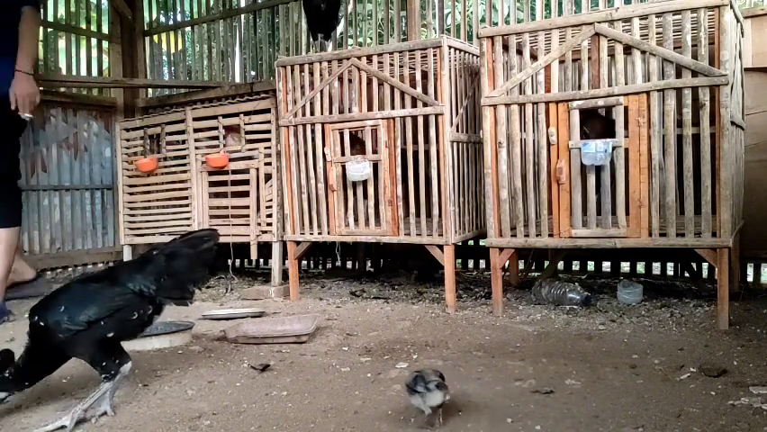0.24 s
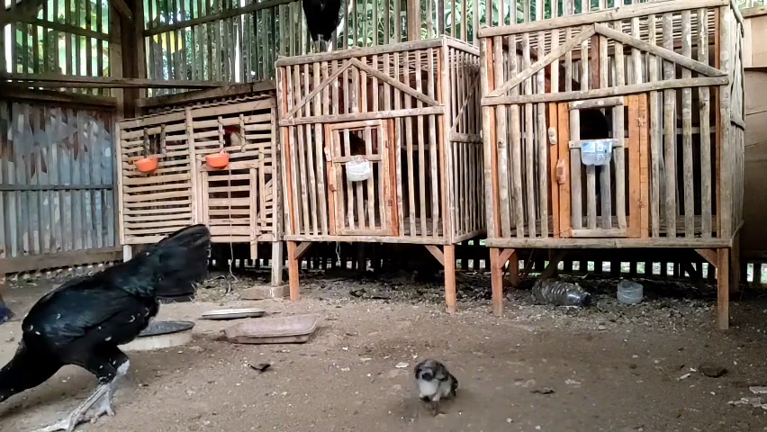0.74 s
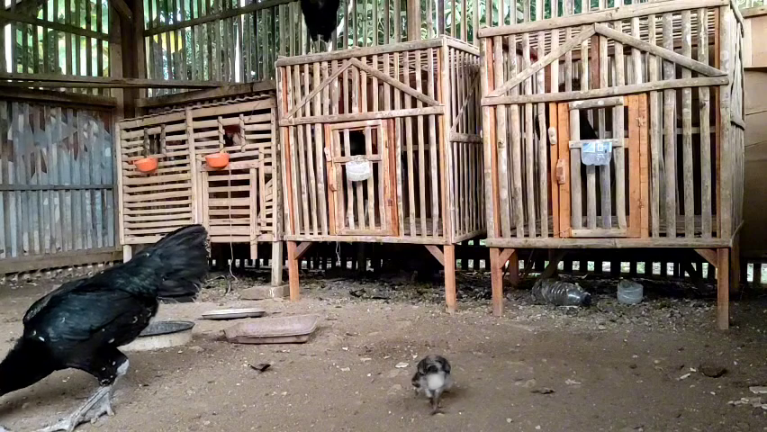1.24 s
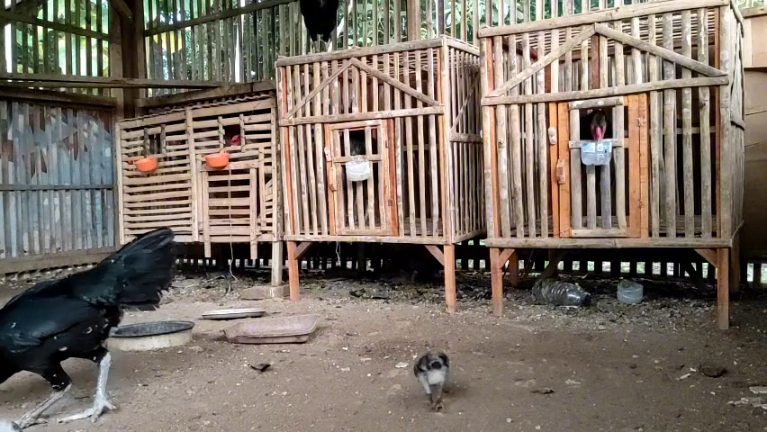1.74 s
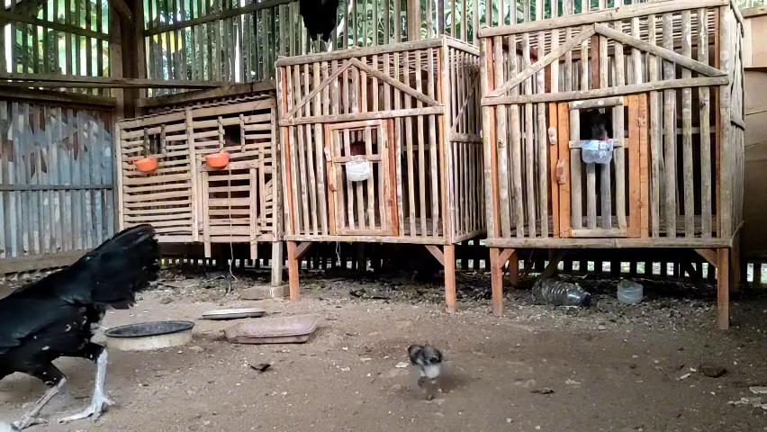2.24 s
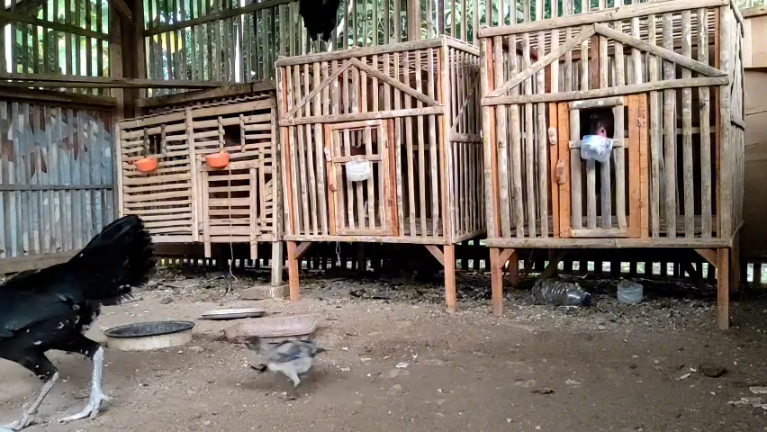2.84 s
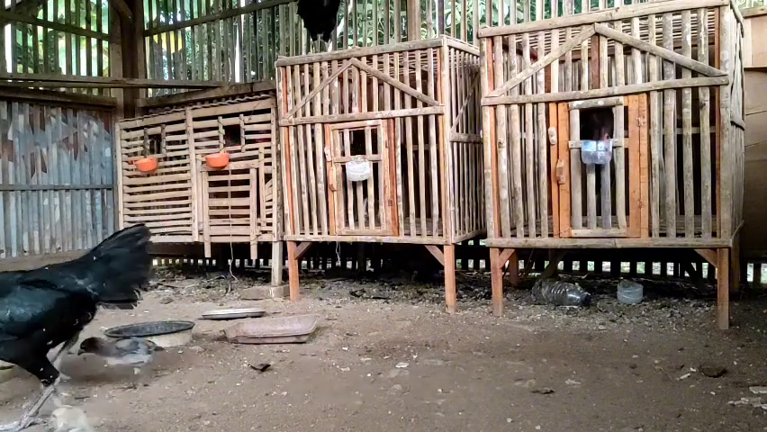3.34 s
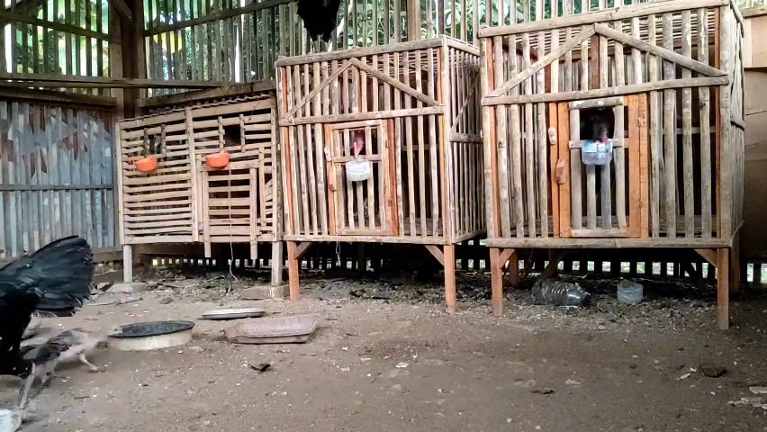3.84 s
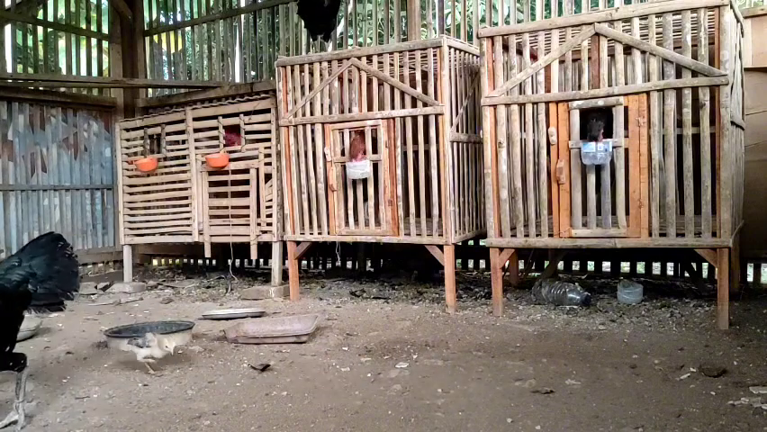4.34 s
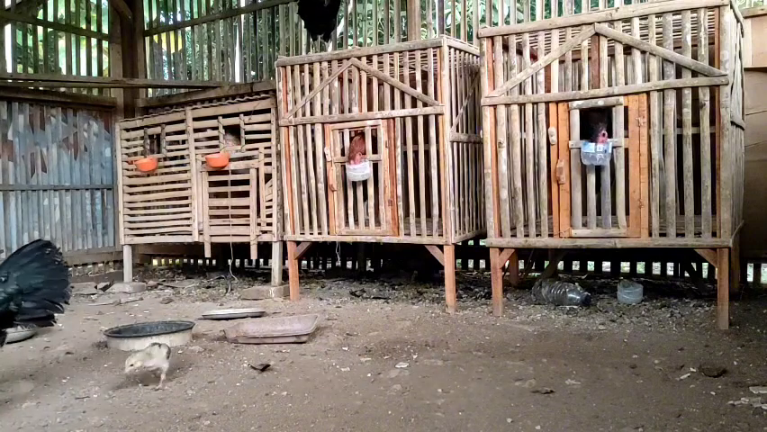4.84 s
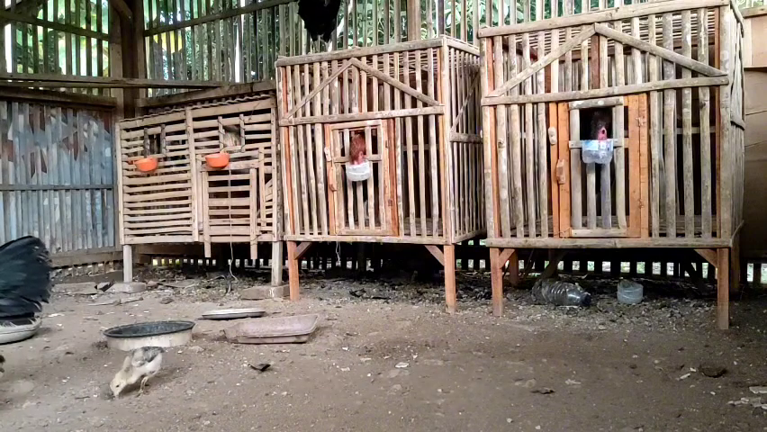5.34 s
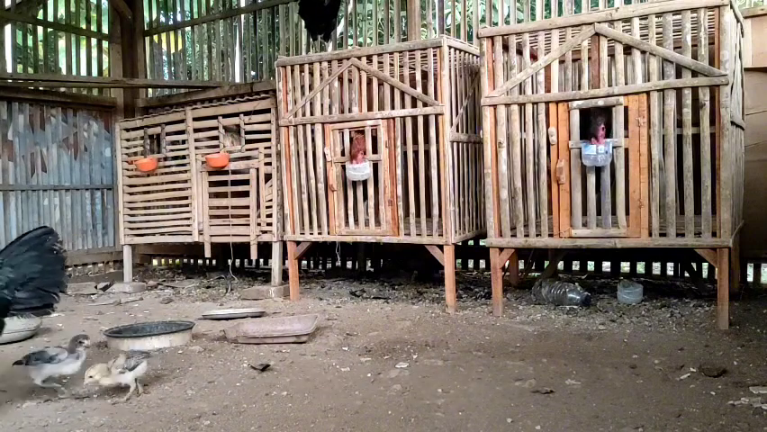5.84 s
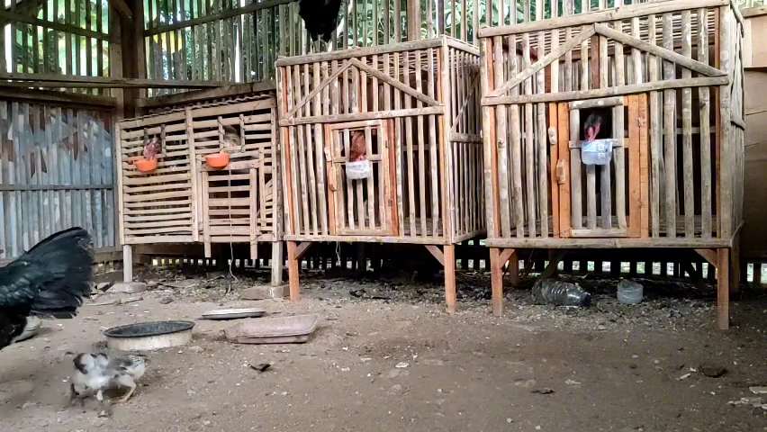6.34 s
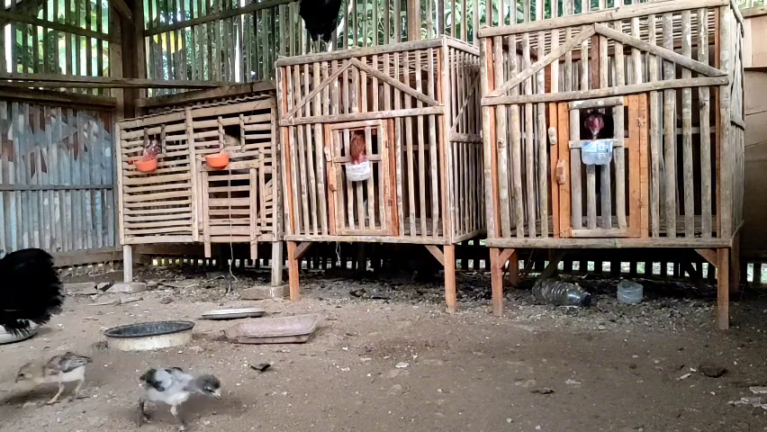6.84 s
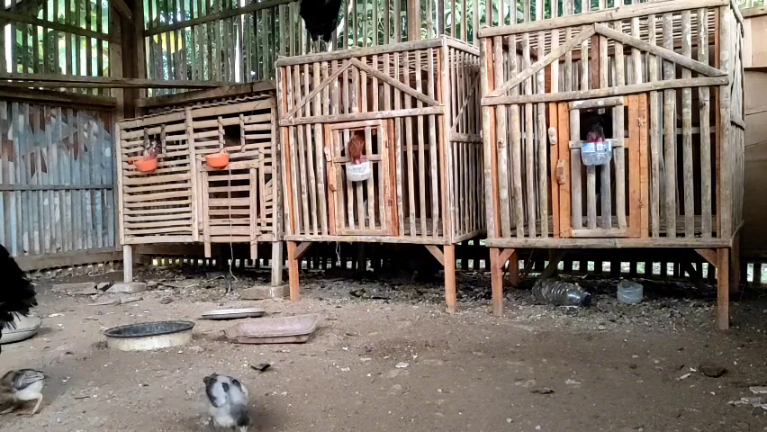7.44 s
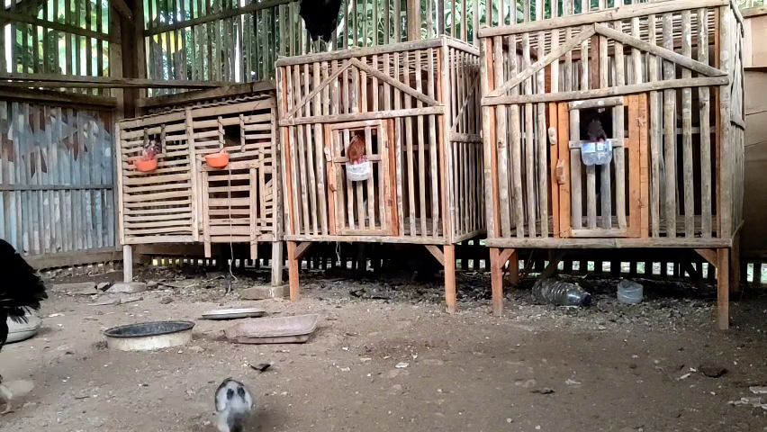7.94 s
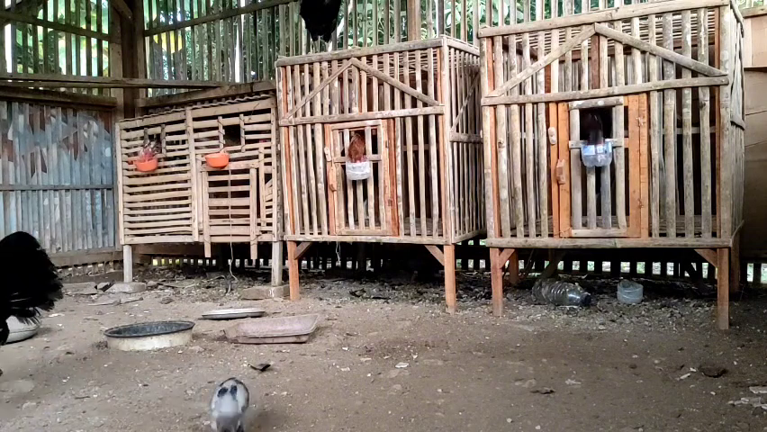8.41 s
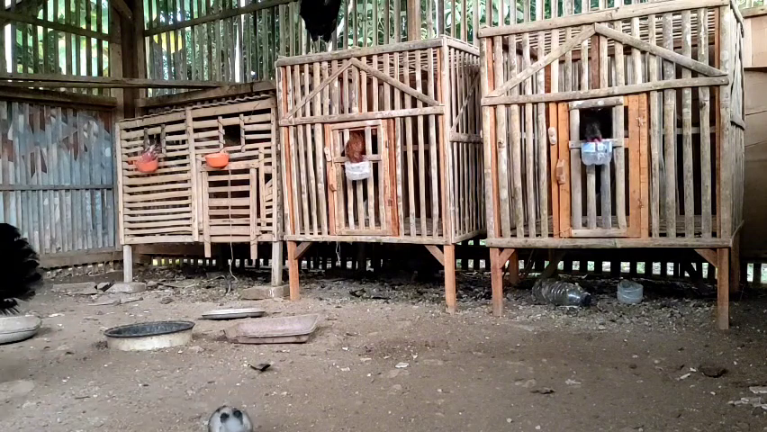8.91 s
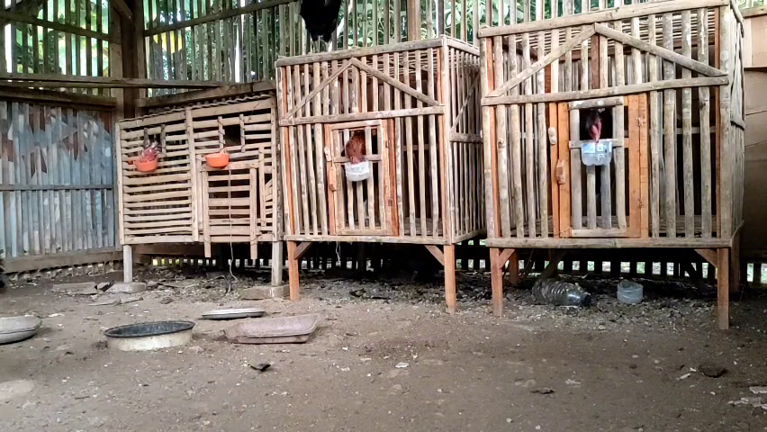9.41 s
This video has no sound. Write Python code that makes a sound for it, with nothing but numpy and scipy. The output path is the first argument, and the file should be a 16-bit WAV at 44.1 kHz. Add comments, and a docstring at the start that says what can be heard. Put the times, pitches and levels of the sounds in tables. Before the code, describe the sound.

Chicks peep all around a chicken shed while hens give short clucks, beaks knock on feed cups and dry grit is swept.

```python
"""A slatted chicken shed with a dirt floor at feeding time, heard on a stereo pair near the cage fronts.
Chicks whistle peeps all round, beaks and feet knock on feed cups and slats, and hens pulse short gruff
clucks through their throats. Litter is scratched up, then dry grit is swept in a few hissing strokes.
Far off, birds hold faint long notes over the outdoor rumble and a soft hiss."""
import sys
import numpy as np
from scipy import signal
from scipy.fft import rfft, irfft, next_fast_len
from scipy.io import wavfile
from scipy.ndimage import uniform_filter1d, map_coordinates

SR = 44100
rng = np.random.default_rng(int(sys.argv[2]) if len(sys.argv) > 2 else 0)


def store_pcm(level_fs):
    """Save levels as 16-bit WAV."""
    pcm = np.round(np.clip(level_fs, -1, 1) * 32767).astype(np.int16)
    wavfile.write(sys.argv[1], SR, np.atleast_2d(pcm).T)


N = 426447

# Levels in all tables are relative: each source adds its own gain.
# Outdoor rumble, yard murmur and far hiss. Each row: frequency in Hz, level in dB.
RUMBLE_SPECTRUM = [(15, -41), (25, -8.5), (123, -9), (177, -2.5), (248, -10.5), (267, -16), (307, -14),
                   (375, -25), (409, -16.5), (500, -23), (650, -28), (1100, -120)]
YARD_SPECTRUM = [(200, -7.5), (400, -1), (700, 3), (1200, -1), (2000, -5.5), (3500, -5.5), (6000, -30)]
FAR_HISS_SPECTRUM = [(2500, -14), (5000, 3), (6700, 2), (7700, 8.5), (8700, -5), (10000, -11),
                     (16000, -15.5)]
# Rise and fall of the yard murmur. Each row: time in seconds, level in dB.
YARD_LEVEL = [(0, -44), (.5, -51), (2.85, -49.5), (3.05, -37), (4.4, -42), (6, -38.5), (7.2, -44),
              (8.35, -51.5), (9.3, -49.5)]
# Near peeps that slide down, turn and flick up. Each row: time of the turn in seconds,
# pitch there in Hz, slide in seconds, flick in seconds, level in dB.
SCOOPS = [(0.257, 2590, 0.02, 0.043, -29), (0.318, 2397, 0.02, 0.026, -31.5),
          (0.494, 2910, 0.029, .04, -30.5), (0.507, 2610, 0.015, 0.031, -30),
          (.736, 2725, 0.029, 0.033, -30), (.846, 2440, .018, 0.037, -29.5),
          (1.054, 2684, 0.012, 0.022, -25), (1.422, 2510, .005, 0.039, -31),
          (1.711, 2508, 0.035, 0.046, -27.5), (1.936, 2460, 0.026, 0.039, -30.5),
          (2.353, 2544, .008, 0.049, -31.5), (2.92, 2480, 0.0096, 0.049, -31),
          (3.122, 2730, 0.031, 0.033, -30), (3.936, 2500, 0.0025, 0.034, -30),
          (5.153, 2590, 0.027, 0.022, -33), (5.345, 2830, 0.019, 0.032, -30),
          (5.433, 2484, 0.013, 0.034, -30.5), (5.805, 2280, 0.0088, 0.032, -32.5),
          (6.228, 2760, 0.013, 0.034, -29), (6.342, 2356, 0.025, .03, -30),
          (6.519, 2365, 0.026, 0.039, -30.5), (6.931, 2610, .017, 0.029, -28.5),
          (6.994, 2416, 0.013, .035, -34), (7.148, 2670, 0.026, 0.034, -30.5),
          (7.148, 2365, 0.019, 0.014, -27), (7.772, 2400, 0.0071, .035, -35),
          (7.826, 2720, 0.017, 0.036, -30.5), (7.978, 2420, 0.0042, .036, -29),
          (8.061, 2746, 0.014, 0.018, -32.5), (8.322, 2610, .02, .038, -36),
          (8.545, 2425, 0.028, 0.036, -32.5), (8.72, 2600, 0.019, 0.028, -33),
          (8.809, 2930, 0.027, 0.029, -33), (9.124, 2450, 0.041, 0.025, -30),
          (9.374, 2745, 0.034, 0.04, -29), (9.616, 2910, 0.032, 0.042, -29)]
# Falling peeps, more echoing, from chicks further back in the cages.
# Each row: start in seconds, length in seconds, top pitch in Hz, level in dB.
DROPS = [(.045, 0.045, 4490, -32.5), (0.092, 0.036, 3170, -31), (0.336, 0.034, 3480, -30),
         (0.985, 0.062, 4230, -31), (1.541, .052, 3960, -35), (1.544, 0.03, 2820, -32.5),
         (1.681, 0.068, 4160, -33), (1.778, 0.038, 3210, -33.5), (1.848, 0.053, 4390, -33),
         (2.059, 0.041, 3150, -31.5), (2.257, 0.023, 3080, -28), (2.317, 0.068, 4270, -31.5),
         (2.453, 0.055, 4390, -30.5), (2.46, 0.028, 3320, -29.5), (2.58, 0.049, 3180, -33),
         (2.697, 0.036, 3270, -33.5), (2.954, 0.064, 4306, -27), (3.063, .085, 4060, -28.5),
         (3.193, 0.074, 4230, -31), (3.639, 0.067, 4335, -28), (3.643, .025, 3100, -29),
         (3.801, .03, 3100, -33), (3.87, 0.032, 3600, -28.5), (3.973, 0.041, 3800, -29),
         (4.189, 0.065, 4020, -31), (4.209, 0.032, 3100, -25.5), (4.324, 0.053, 4160, -27.5),
         (4.468, .062, 4134, -29), (4.521, 0.038, 3120, -28), (4.635, 0.04, 3720, -33.5),
         (4.96, 0.035, 3870, -35), (5.102, 0.037, 4050, -34), (5.278, 0.038, 3200, -31.5),
         (5.669, 0.052, 3030, -31.5), (6.325, 0.05, 4160, -36), (6.482, 0.042, 4330, -29.5),
         (6.76, 0.04, 3040, -28.5), (7.058, 0.034, 3260, -31.5), (7.59, 0.061, 2903, -29.5),
         (7.681, 0.049, 3110, -33.5), (8.11, 0.058, 4120, -39), (8.487, 0.07, 3050, -35),
         (8.823, 0.029, 3020, -29.5), (8.91, .044, 3224, -31.5), (9.222, 0.02, 3100, -28.5)]
# Flatter cheeps. Each row: start and length in seconds, middle pitch and glide in Hz, level in dB.
CHEEPS = [(0, 0.013, 2865, -600, -26), (0.288, .037, 3230, -400, -44), (.625, 0.036, 2230, -160, -48),
          (1.145, 0.043, 2576, -150, -29), (1.221, 0.054, 3000, 734, -27), (1.344, 0.039, 2720, -220, -27),
          (2.636, 0.04, 2724, 186, -34.5), (2.83, 0.062, 2530, -150, -31.5), (2.9, 0.047, 4570, -86, -30),
          (3.517, 0.054, 4210, -250, -28.5), (6.053, 0.049, 2860, -150, -30),
          (6.364, 0.138, 2824, 169, -34), (7.212, 0.047, 3020, -450, -31.5), (7.27, 0.03, 1705, -60, -42),
          (7.739, 0.044, 2980, -340, -33.5), (7.851, 0.084, 2992, -250, -32.5),
          (8.233, 0.046, 2768, 60, -27), (9.189, 0.064, 3085, -340, -34)]
# A chick's overtones leaving the beak. Each row: frequency in Hz, level in dB.
PEEP_OVERTONES = [(5000, -13.5), (6200, -8.5), (7200, -16), (8500, -21.5), (12000, -47)]
# Beaks and feet striking. Each row: time in seconds, level in dB, hardness from 0 (dull, on a slat)
# to 1 (sharp, on a cup), lead of the first graze in seconds.
KNOCKS = [(0.124, -35, 0.82, 0.0082), (.18, -33, 0.42, 0.0035), (.357, -42, 0.8, 0.0023),
          (1.98, -31, 0.48, 0.027), (2.11, -24.5, 0, 0.0027), (2.578, -19, 0.3, 0.0022),
          (2.603, -16.5, 0.17, 0.00091), (2.88, -18, 0.019, 0.0061), (2.984, -26.5, 0.089, 0.0022),
          (3.285, -29, 0.76, 0.0032), (3.393, -16, 0.17, 0.0024), (3.442, -20.5, 0.76, .002),
          (3.54, -15, .6, 0.023), (3.594, -23.5, 1, 0.0019), (3.688, -25.5, 0.45, 0.043),
          (3.774, -17, 0.68, 0.0052), (3.826, -33, 1, 0.0018), (3.945, -27.5, 0, 0.0024),
          (4.071, -21, 0.35, 0.0019), (4.424, -15.5, 0.76, 0.0077), (4.701, -19, 0.44, 0.0019),
          (4.765, -30.5, .1, 0.0023), (5.015, -18.5, 0.59, .022), (5.365, -27, 0.33, 0.0018),
          (5.819, -16.5, 0.26, 0.00102), (6.175, -25, 0.45, 0.021), (6.268, -31.5, 0.79, 0.0019),
          (6.436, -25, 0.48, .002), (6.448, -25.5, .7, .002), (6.733, -15.5, 0.78, 0.021),
          (7.039, -27, .4, .002), (7.325, -19.5, 0.36, .003), (7.374, -21.5, 0.47, 0.0024),
          (7.428, -27, 0.54, 0.0025), (7.621, -16.5, 0.63, 0.0023), (7.642, -17, 0.87, .002),
          (7.952, -15, 0.71, 0.027), (8.18, -18, 0.47, 0.0019), (8.269, -11.5, 0.99, 0.01),
          (8.482, -19.5, 0.4, 0.016), (8.51, -26, 0.07, 0.0019), (8.592, -13, 0.94, .008),
          (8.802, -24.5, .2, 0.0022), (8.997, -19, 0.7, 0.016), (9.314, -13.5, 0.93, 0.012),
          (9.535, -20.5, 0.61, 0.0021)]
# Ring of a feed cup. Each row: frequency in Hz, width in Hz, level in dB.
CUP_MODES = [(1124, 83, 9), (1320, 64, 3), (1400, 79, -3.5), (1460, 120, -18.5)]
# A peck's force, a slat's thud and loose grain's tick. Each row: frequency in Hz, level in dB.
PECK_SPECTRUM = [(300, -5.5), (900, 2), (1650, -0.5), (2000, -10), (2700, 1.5), (4000, -4.5), (12000, -25)]
SLAT_SPECTRUM = [(90, -33), (200, -13.5), (320, -2.5), (420, -4), (570, -1), (800, -8), (1000, 3.5),
                 (1800, -49), (3000, -59), (9000, -69)]
TICK_SPECTRUM = [(900, -35.5), (1800, -3.5), (2600, 6), (3300, -5), (4200, 1.5), (5300, -1.5), (7500, -1),
                 (8800, -6.5), (10500, -19), (16000, -26.5)]
# Claws and beaks on grit. Each row: time in seconds, level in dB.
GRIT_CLICKS = [(0.177, -26), (.745, -27.5), (0.849, -31), (1.354, -29.5), (1.979, -20), (2.111, -32),
               (2.48, -29), (2.58, -45), (2.876, -18), (3.282, -21.5), (3.511, -24), (3.558, -17.5),
               (3.591, -19), (3.652, -28), (4.765, -24), (4.994, -32), (5.314, -24), (6.152, -21),
               (6.449, -19), (7.427, -23), (7.919, -15.5), (8.356, -27.5), (8.411, -32.5), (8.678, -28),
               (9.302, -25.5), (9.405, -30)]
# Hens clucking. Each row: start in seconds, length in seconds, pitch in Hz, level in dB,
# throat resonance in Hz, roughness from 0 to 1.
CLUCKS = [(1.009, 0.024, 182.2, -22, 510, 0.31), (1.403, 0.046, 208.7, -25.5, 530, 0.42),
          (1.422, 0.019, 200, -23.5, 810, 0.12), (2.114, 0.046, 187.7, -37, 670, 0.54),
          (2.587, 0.047, 175, -22, 910, 0.1), (3.387, 0.015, 197, -17.5, 470, 0.3),
          (3.426, 0.043, 189.7, -21, 760, 0.6), (4.068, 0.036, 203.6, -27, 600, 0.2),
          (5.819, 0.027, 189.4, -25, 746, 0.4), (8.49, 0.046, 193.6, -29, 603, 0.29),
          (8.801, 0.032, 180.2, -27, 570, 0.38)]
# Overall tone of a hen's voice. Each row: frequency in Hz, level in dB.
HEN_SPECTRUM = [(100, 9), (250, -7), (1300, -0.5), (2300, -2.5), (6000, -44)]
# Distant birds, one list to a note. Each row: time in seconds, pitch in Hz, level in dB.
FAR_NOTES = [
    [(2.97, 430, -56), (3.08, 430, -43), (3.3, 408, -43), (3.55, 408, -38), (3.75, 402, -40),
     (3.95, 390, -52)],
    [(4.55, 670, -58), (4.8, 725, -49), (5.3, 705, -48), (5.75, 685, -48), (6.2, 680, -54), (7.3, 650, -57)],
]
# Scratches in the litter, feet trampling the ground and sweeps over grit.
# Each row: time of full force in seconds, hold in seconds, level in dB, release in dB per second.
SCRATCHES = [(2.99, 0.34, -32, 150), (3.282, 0.0066, -19, 131), (3.394, 0.059, -23, 130),
             (3.511, 0.037, -27, 75), (3.776, 0.0075, -27.5, 78), (3.955, 0.11, -37, 164),
             (4.085, 0.011, -22, 262)]
TRAMPLES = [(2.99, 0.29, -28, 120), (3.392, 0.38, -28.5, 60)]
SWEEPS = [(4.72, 0.26, -14, 83), (5.535, 0.11, -14, 38), (5.93, 0.17, -22.5, 99.5),
          (6.625, 0.011, -17, 59.5)]
# Crackling litter, trampled ground and swept grit. Each row: frequency in Hz, level in dB.
LITTER_SPECTRUM = [(900, -27), (1800, -20), (3400, -12.5), (4300, -6.5), (5400, -6), (7400, -4),
                   (8800, -10), (10400, -20), (16000, -31)]
GROUND_SPECTRUM = [(88, -41), (150, -6), (363, -7.5), (404, 1), (599, -23), (932, -10), (1330, -18),
                   (1480, -12.5), (2280, -26), (2600, -15), (3380, -44), (5720, -120)]
SWEEP_SPECTRUM = [(500, -30), (1000, -23.5), (1500, -15), (2000, -13), (2750, -9), (3700, -13), (5300, -11),
                  (6400, -9.5), (7500, -6.5), (9000, -11), (10000, -17.5), (12000, -20), (16000, -22.5)]
# The shed's reverberation. Each row: frequency in Hz, seconds to die away by 60 dB.
SHED_T60 = [(200, 0.32), (1200, 0.28), (3000, 0.39), (9000, 0.24)]
# Phase between the microphones near the cage fronts. Each row: frequency in Hz, left lead in radians.
FRONT_PHASE = [(100, -1.1), (500, 0.37), (700, -1.5), (950, 2.5), (1100, 1.9), (1350, -2), (1700, -0.3)]
# Microphone port resonances, left then right. Each row: frequency in Hz, width in Hz, level in dB.
MIC_PORTS = [(8670, 720, 10.5), (7346, 1230, 9)]


def amp(db):
    """Decibels to gain."""
    return 10 ** (np.asarray(db) / 20)


def unit(x):
    """Scale to rms 1."""
    return x / np.sqrt(np.mean(x ** 2) + 1e-20)


def along(points, hz):
    """Read (Hz, value) points on a log axis."""
    freqs, values = np.transpose(points)
    return np.interp(np.log(hz + 1), np.log(freqs + 1), values)


def curves(rows):
    """One value per sample for each column after the time."""
    times, *columns = np.transpose(rows)
    return [np.interp(np.arange(N) / SR, times, column) for column in columns]


def during(rows):
    """A soft gate over the span of a curve table."""
    t = np.arange(N) / SR
    return uniform_filter1d(1. * ((t > rows[0][0]) & (t < rows[-1][0])), size=900)


def wobble(rate, n=N):
    """A smooth random curve, rate knots a second."""
    knots = rng.standard_normal(int(n * rate / SR) + 4)
    return map_coordinates(knots, [np.arange(n) * rate / SR])


def panned(left_db):
    """Left and right gains of mean power 1."""
    return unit(amp([[left_db / 2], [-left_db / 2]]))


def add(track, start, x):
    """Mix x into the track from start, in seconds."""
    part = track[:, max(round(start * SR), 0):][:, :x.shape[-1]]
    part += x[..., :part.shape[-1]]


def filtered(x, response):
    """Pass x through a complex response of frequency."""
    n = x.shape[-1]
    padded = 2 * next_fast_len(n // 2 + 2048)
    return irfft(rfft(x, padded) * response(np.fft.rfftfreq(padded, 1 / SR)), padded)[..., :n]


def colour(points):
    """The causal response with this (Hz, dB) spectrum."""
    def response(hz):
        cepstrum = irfft(np.log(amp(along(points, hz))))
        cepstrum[1:len(hz) - 1] *= 2
        cepstrum[len(hz):] = 0
        return np.exp(rfft(cepstrum))
    return response


def resonances(modes):
    """The response of (Hz, width Hz, dB) modes, alternating in sign."""
    return lambda hz: sum((-1) ** k * amp(db) * 1j * hz * width / (centre**2 - hz**2 + 1j * hz * width)
                          for k, (centre, width, db) in enumerate(modes))


def rush(spectrum, alike, grain_db=0):
    """Stereo noise of rms 1; alike correlates the microphones, grain_db clumps it into tiny impacts."""
    mid, side = rng.standard_normal((2, N)) * amp(grain_db * np.minimum(wobble(1400), 2))
    turn = np.arccos(alike) / 2
    mid, side = mid * np.cos(turn), side * np.sin(turn)
    return unit(filtered(np.array([mid + side, mid - side]), lambda hz: amp(along(spectrum, hz))))


def in_shed(x, near_db, tail_db, near_t60):
    """Add echoes of the nearby cages and the shed's tail, new for each position."""
    hz, t, noise = signal.stft(rng.standard_normal((2, SR // 3)), SR, nperseg=256)
    shared = amp(-hz / 200)[:, None]  # long waves reach both microphones alike
    noise = np.sqrt(1 - shared ** 2) * noise + shared * (noise[0] + noise[1]) / np.sqrt(2)
    tail = signal.istft(noise * amp(-60 * t / along(SHED_T60, hz)[:, None]), SR, nperseg=256)[1]
    t = np.arange(tail.shape[1]) / SR
    tail *= 1 - np.exp(-t / 0.0041)
    near = tail * amp(-60 * t / near_t60)
    echo = amp(near_db) * near / np.linalg.norm(near[0]) + amp(tail_db) * tail / np.linalg.norm(tail[0])
    echo[:, 0] += 1  # the direct sound
    return signal.fftconvolve(np.atleast_2d(x), echo / np.linalg.norm(echo[0]), axes=1)


def off_cages(x):
    """Reflections from the cage fronts turn the phase between the microphones."""
    return filtered(x, lambda hz: np.exp(.5j * along(FRONT_PHASE, hz) * np.array([[1], [-1]])))


def background():
    """Rumble, yard murmur and far hiss lie behind small feet pattering on grit."""
    yard_db, = curves(YARD_LEVEL)
    rumble = amp(-40 + wobble(17)) * rush(RUMBLE_SPECTRUM, alike=0.89) * panned(5.3)
    yard = amp(yard_db + 4.5 * wobble(21)) * rush(YARD_SPECTRUM, alike=0.043) * panned(2.3)
    hiss = amp(-52.5) * rush(FAR_HISS_SPECTRUM, alike=0.03)
    patter = amp(-55.5 + 5.5 * wobble(28)) * rush(TICK_SPECTRUM, alike=0.059, grain_db=9.5)
    return rumble + yard + hiss + patter


def peep(hz, db, far_db=0, fade_db=0):
    """A chick whistles along a pitch path from a random spot; far_db adds echo."""
    n = len(hz)
    side, distance, brightness = rng.standard_normal(3)
    echo_db = -2.5 + 1.5 * distance + far_db
    phase = 2 * np.pi * np.cumsum(hz * (1 + 0.0074 * wobble(480, n))) / SR
    overtones = sum(amp(along(PEEP_OVERTONES, k * hz) + 1.2 * brightness) * np.sin(k * phase)
                    for k in (2, 3))
    swell = signal.windows.tukey(n, .2) * amp(2.8 * wobble(118, n) - fade_db * np.linspace(0, 1, n))
    whistle = unit((np.sin(phase) + overtones) * swell)
    sound = in_shed(whistle, near_db=echo_db, tail_db=echo_db, near_t60=.14)
    return amp(db - 2) * panned(-1.5 + 0.91 * side) * sound


def drop(top_hz, length):
    """A peep's pitch falls ever faster; the higher it starts, the longer it lingers at the top."""
    toward_hz, share_of_way = 2217, .8
    progress = np.linspace(0, 1, int(length * SR))
    arch = 1.1 * (top_hz / toward_hz) ** 1.45
    return top_hz - share_of_way * (top_hz - toward_hz) * progress ** arch


def scoop(turn_hz, slide_s, flick_s):
    """A peep's pitch bends down to a turn and up again."""
    slide_hz, flick_hz, bend_s = 787, 1034, .03  # pitch above the turn, bend_s before and after it
    t = np.arange(-int(slide_s * SR), int(flick_s * SR)) / SR
    return turn_hz + np.where(t < 0, slide_hz, flick_hz) * (t / bend_s) ** 2


def chicks(chatter_per_s=3):
    """Near chicks scoop and cheep; falling peeps and faint chatter echo from further back."""
    out = np.zeros((2, N))
    for turn, hz, slide_s, flick_s, db in SCOOPS:
        add(out, turn - slide_s, peep(scoop(hz, slide_s, flick_s), db, fade_db=2))
    for start, length, hz, db in DROPS:
        add(out, start, peep(drop(hz, length), db, far_db=3, fade_db=-3))
    for start, length, hz, glide_hz, db in CHEEPS:
        add(out, start, peep(hz + glide_hz * np.linspace(-.5, .5, int(length * SR)), db))
    for when, height, kind in rng.random((int(chatter_per_s * N / SR), 3)):
        if kind < .5:
            path = drop(3000 + 1200 * height, length=.05)
        else:
            path = scoop(2400 + 500 * height, slide_s=.022, flick_s=.036)
        add(out, when * N / SR, peep(path, db=-49, far_db=3))
    return out


def impact(response, rattle, rattle_t60, near_db, tail_db):
    """A hit and its brief rattle sound through one body into the shed; rms 1 over the first 10 ms."""
    t = np.arange(SR // 10) / SR
    force = rattle * rng.standard_normal(len(t)) * amp(-60 * t / rattle_t60)
    force[0] += 1
    sound = in_shed(filtered(force, response), near_db, tail_db, near_t60=0.097)
    return sound / np.sqrt(np.mean(sound[:, :SR // 100] ** 2))


def blow(db, hardness):
    """A sharp peck is dry and rings the cup's upper modes; a dull one thuds and rings the lowest."""
    clean = hardness ** 2.15  # how far the cup takes over from the slats
    modes = [(hz, width, level + rng.normal(0, 3.4) - (13 * clean if k == 0 else 9 * (1 - clean)))
             for k, (hz, width, level) in enumerate(CUP_MODES)]

    def cup(hz):
        return sum(resonances([mode])(hz) for mode in modes) * colour(PECK_SPECTRUM)(hz)
    thud = impact(colour(SLAT_SPECTRUM), rattle=0.23, rattle_t60=0.057, near_db=-9.5, tail_db=1)
    ring = impact(cup, rattle=0.11, rattle_t60=0.012, near_db=-7.9 * clean, tail_db=-4 - 7.8 * clean)
    return amp(db) * (amp(-1.5 - 26 * clean) * thud + amp(-6.5 + 5 * hardness) * ring)


def tick(db):
    """Loose grain rattles briefly."""
    grain = impact(colour(TICK_SPECTRUM), rattle=0.3, rattle_t60=0.042, near_db=-1.5, tail_db=2.5)
    return amp(db - 6.5) * grain


def knocks(graze_db=-9.5):
    """At the cage fronts beaks and feet graze, then strike, shaking grain; claws click on grit."""
    blows, ticks = np.zeros((2, 2, N))
    for start, db, hardness, lead_s in KNOCKS:
        add(blows, start - lead_s, blow(db + graze_db, 0.72 * hardness))
        add(blows, start, blow(db, hardness))
        tick_db = -17 + 0.51 * db  # louder blows shake the grain more
        add(ticks, start - lead_s, tick(tick_db))
        add(ticks, start, tick(tick_db + 0.5))
    for start, db in GRIT_CLICKS:
        add(ticks, start, tick(db))
    return off_cages(blows) * panned(2.8) + ticks


def hens():
    """Left of centre, each cluck is a few uneven syrinx pulses, arching in pitch, through the throat."""
    out = np.zeros((2, N))
    t = np.arange(SR // 8) / SR
    for start, length, pitch_hz, db, throat_hz, rough in CLUCKS:
        progress = np.clip(t / length, 0, 1)
        hz = pitch_hz * (.94 + 0.0996 * np.sin(np.pi * progress) + 0.13 * rough * wobble(250, len(t)))
        cycle = np.cumsum(hz) / SR
        pulses = unit(np.diff(np.floor(cycle), prepend=-1))
        rasp = unit(rng.standard_normal(len(t)) * np.exp(-3 * (cycle % 1)))
        push = np.abs(np.sin(np.pi * progress ** .85))
        throat = resonances([(335, 150, -3), (throat_hz, 170, 0), (1080, 200, -10), (1650, 300, -19)])
        voice = filtered((pulses + rough * rasp) * push, throat)
        voice = filtered(voice, colour(HEN_SPECTRUM))
        voice = in_shed(voice, near_db=-5, tail_db=-5, near_t60=.09)
        add(out, start, amp(db) * voice / np.sqrt(np.mean(voice[:, :int(length * SR)] ** 2)))
    return off_cages(out) * panned(2.5)


def far_birds():
    """Birds hold long hoarse notes that waver, blurred by distance."""
    out = np.zeros((2, N))
    for note in FAR_NOTES:
        hz, db = curves(note)
        phase = 2 * np.pi * np.cumsum(hz * (1 + .06 * wobble(110))) / SR
        tone = unit(np.sin(phase) + amp(-12) * np.sin(2 * phase))
        call = tone * amp(db + 2.5 * wobble(25)) * during(note)
        add(out, 0, in_shed(call, near_db=-10, tail_db=-2, near_t60=0.3))
    return out


def strokes(rows, rise_db_per_s):
    """Gain of a run of strokes: each swells, holds and dies away."""
    t = np.arange(N) / SR
    power = np.zeros(N)
    for peak, hold, db, release in rows:
        before, after = np.maximum(peak - t, 0), np.maximum(t - peak - hold, 0)
        power += amp(db - rise_db_per_s * before - release * after) ** 2
    return np.sqrt(power)


def scuffling():
    """Scratched litter crackles in clumps while the trampled ground under it rumbles."""
    clumps = amp(-4 + 1.7 * wobble(55))
    crackle = strokes(SCRATCHES, rise_db_per_s=2200) * rush(LITTER_SPECTRUM, alike=0.042, grain_db=1.5)
    ground = strokes(TRAMPLES, rise_db_per_s=2200) * rush(GROUND_SPECTRUM, alike=0.35, grain_db=2)
    return clumps * (crackle * panned(-1.1) + ground * panned(4))


def sweeping():
    """Dry grains slide and collide in each stroke, hissing wide across the microphones."""
    grains = rush(SWEEP_SPECTRUM, alike=0.015, grain_db=1)
    force = strokes(SWEEPS, rise_db_per_s=277) * amp(-5.5 + 0.18 * wobble(45))
    return force * grains * panned(-0.27)


def scene():
    """The shed and the outdoors as they reach the two microphones."""
    return background() + chicks() + knocks() + hens() + far_birds() + scuffling() + sweeping()


def record(dry):
    """Each microphone port rings in the treble; peaks are rounded and the very top is cut off."""
    ceiling, top_hz = .92, 16100
    heard = filtered(dry, lambda hz: np.array([1 + resonances([port])(hz) for port in MIC_PORTS]))
    rounded = heard / (1 + np.abs(heard / ceiling) ** 8) ** (1 / 8)
    return filtered(rounded, lambda hz: hz < top_hz)


dry = scene()
out = record(dry)
store_pcm(out)
```